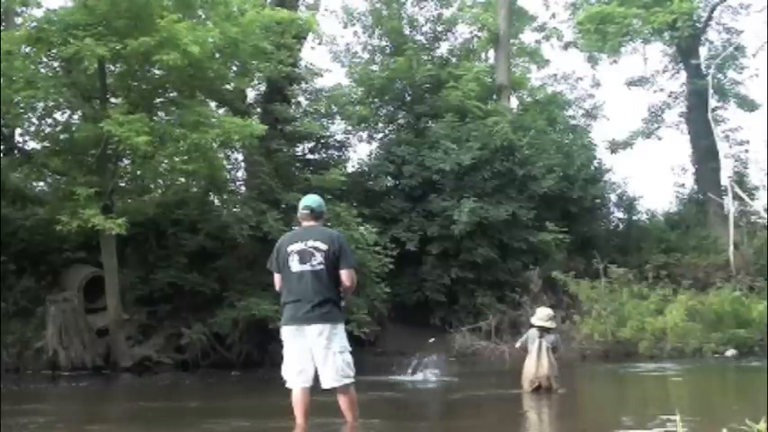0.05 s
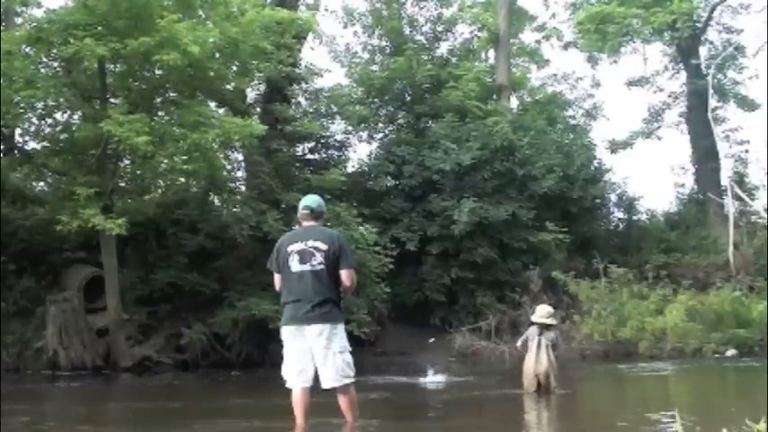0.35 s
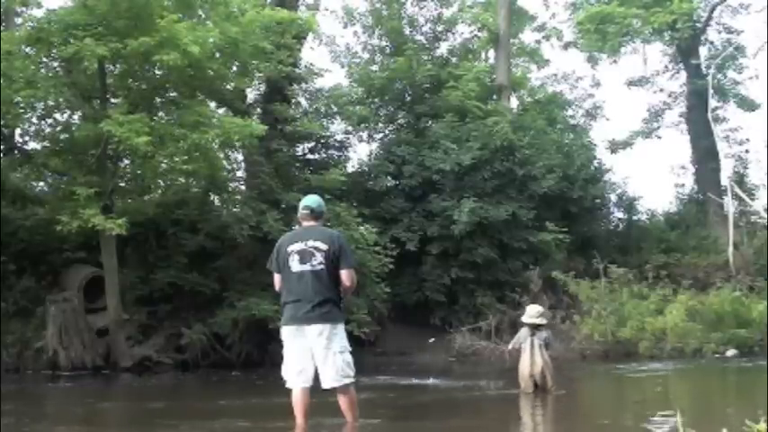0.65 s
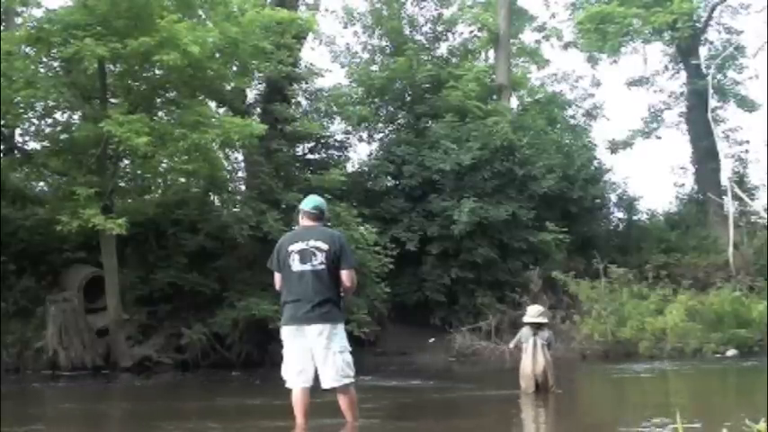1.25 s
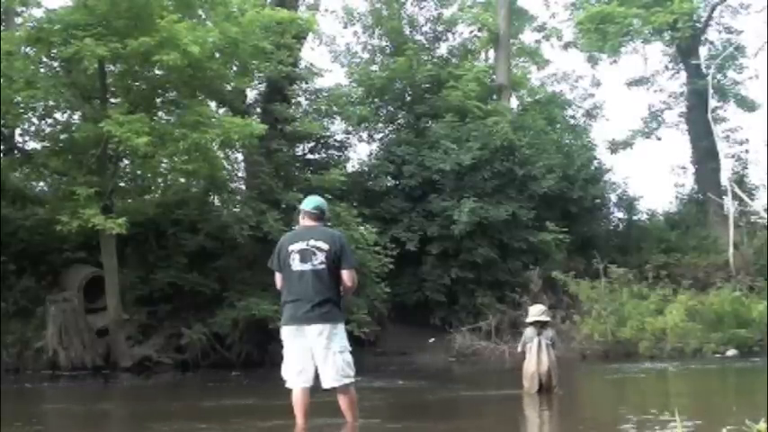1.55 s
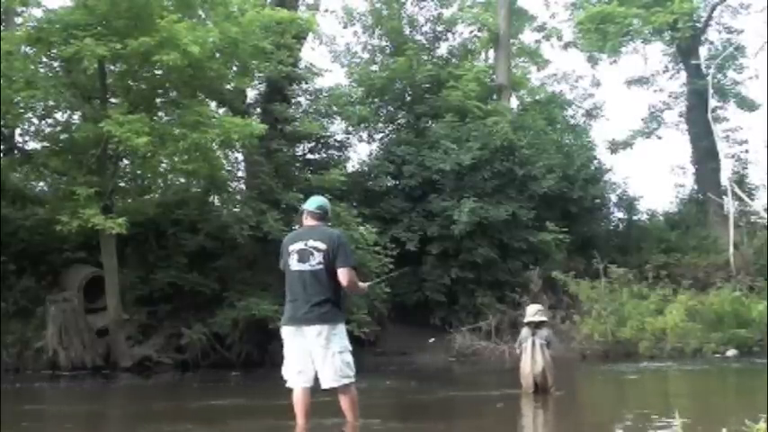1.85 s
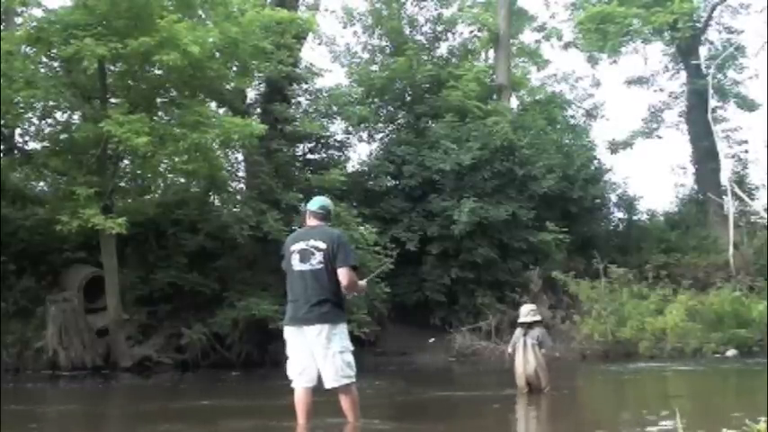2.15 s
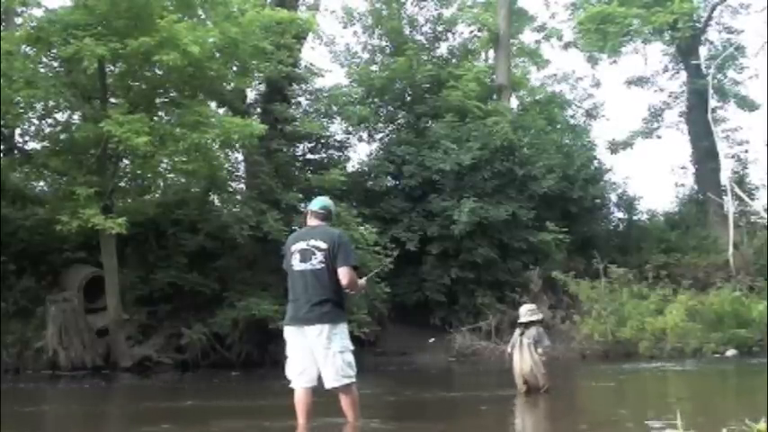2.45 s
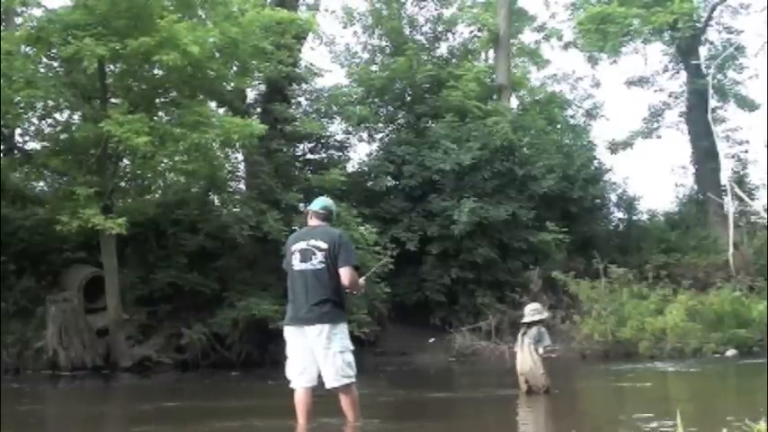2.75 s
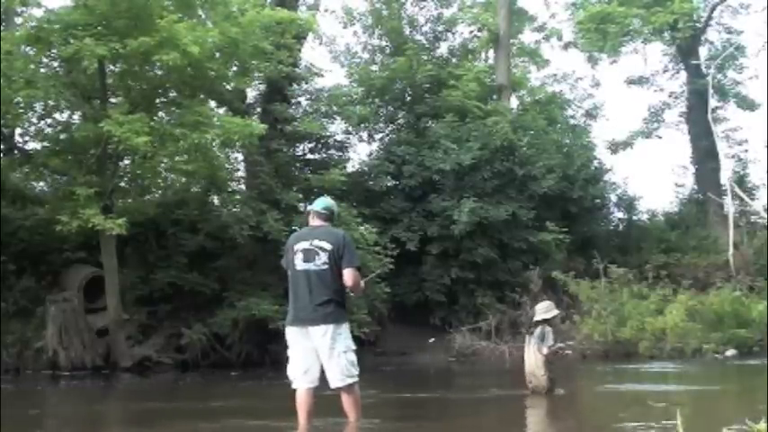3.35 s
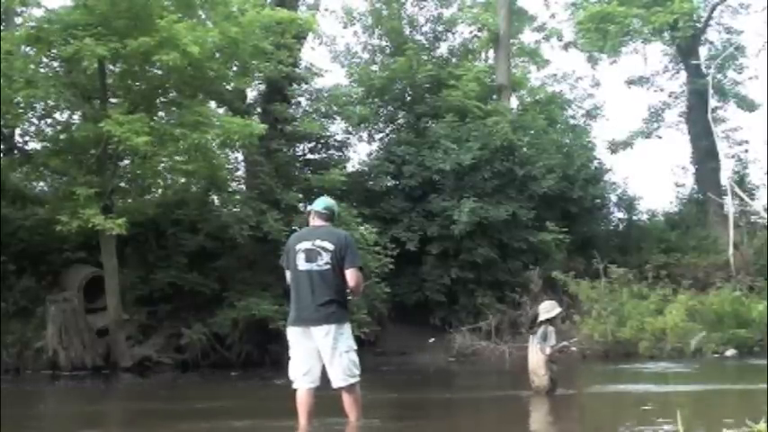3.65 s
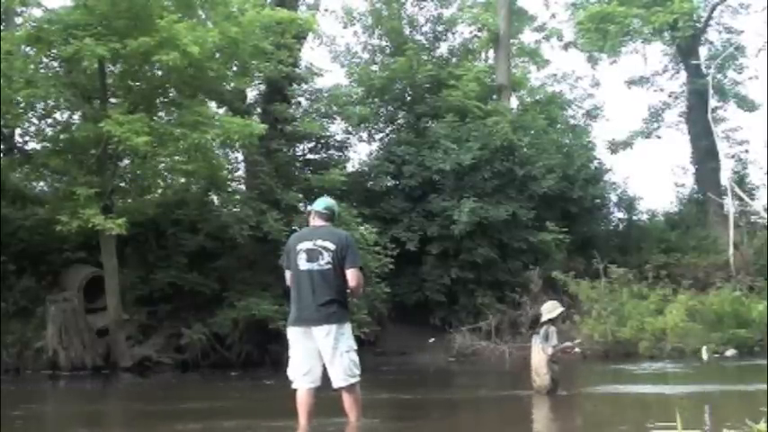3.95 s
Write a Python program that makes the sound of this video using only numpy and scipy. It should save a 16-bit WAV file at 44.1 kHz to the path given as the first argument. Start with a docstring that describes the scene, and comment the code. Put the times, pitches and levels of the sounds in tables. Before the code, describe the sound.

Water splashes in a shallow stream and settles into scattered drips before a smaller, sharp splash follows. Around it, birds chirp, buzz and trill from the bank, with faint insect hiss and a distant motor hum.

```python
"""A shallow creek. Something splashes: water sloshes, spray patters down and trapped air plops, mostly
dying away within a second. Stray drops tick; two sharp splats and more spray follow near 3 s.
Birds whistle, slur, buzz and trill in the trees on the bank, their gliding tones scattered by leaves,
over a low outdoor rumble, a thin insect hiss and a distant motor hum."""
import sys
import numpy as np
from scipy import signal
from scipy.fft import rfft, irfft
from scipy.io import wavfile

SR = 44100
rng = np.random.default_rng(int(sys.argv[2]) if len(sys.argv) > 2 else 0)


def pcm_store(signal):
    """Save signal as 16-bit PCM."""
    levels = np.round(np.clip(np.atleast_2d(signal), -1, 1) * 32767)
    wavfile.write(sys.argv[1], SR, levels.astype(np.int16).T)


N = 176400
T, HZ = np.arange(N) / SR, np.fft.rfftfreq(N, 1 / SR)

# Spray spectrum. Each row: frequency in Hz, relative level in dB.
SPRAY_SPECTRUM = [(1500, 2), (3000, 0.5), (4800, -5.5), (6500, 1), (8000, 4), (9500, -1), (11000, -5),
                  (13500, -9.5), (16000, -37)]


def amp(db):
    """Decibels to gain."""
    return 10 ** (np.asarray(db) / 20)


def unit(x):
    """Scale to rms 1."""
    return x / np.sqrt(np.mean(x ** 2) + 1e-20)


def at_hz(table, hz):
    """Interpolate on a log-frequency axis."""
    table_hz, value = np.transpose(table)
    return np.interp(np.log(hz + 1), np.log(table_hz), value)


def envelope(table, column=1):
    """Gain over time from one dB column."""
    table = np.array(table)
    return amp(np.interp(T, table[:, 0], table[:, column]))


def add(mix, start_s, sound):
    """Mix a sound in at start_s."""
    part = mix[max(round(start_s * SR), 0):][:len(sound)]
    part += sound[:len(part)]


def drift(rate_hz):
    """Random wander below rate_hz, rms 1."""
    return unit(irfft(rfft(rng.standard_normal(N)) / (1 + (HZ / rate_hz) ** 4), N))


def echoes(x, t60_s, spread):
    """Sparse reflections off leaves or banks; spread sets the stereo width."""
    t = T[:SR]
    taps = rng.standard_normal((2, SR)) * (rng.random((2, SR)) < .05)
    taps *= amp(-60 * t / t60_s) * (1 - np.exp(-t / .0029))
    taps /= np.linalg.norm(taps, axis=1, keepdims=True)
    mid, side = signal.fftconvolve(x[None], taps, axes=1)[:, :N]
    return np.array([mid + spread * side, mid - spread * side])


def bubble(hz, t60_s):
    """Trapped air rings: one-cycle attack, rising pitch, exponential decay."""
    t = np.arange(0, t60_s, 1 / SR)
    ring = np.sin(2 * np.pi * hz * t * (1 + .18 * t / t60_s))
    return ring * (1 - np.exp(-t * hz)) * amp(-60 * t / t60_s)


def bubble_swarm(low_hz, high_hz, per_s, spread_db, cycles=28, sizes=30):
    """Bubbles of many sizes ring at random times and strengths."""
    out = np.zeros(N)
    for hz in np.geomspace(low_hz, high_hz, sizes):
        hits = (rng.random(N) < per_s / sizes / SR) * amp(spread_db * rng.exponential(1, N).clip(max=3))
        out += signal.oaconvolve(hits, bubble(hz, cycles / hz))[:N] * np.sqrt(hz)
    return unit(out)


def spray_patter(per_s, spread_db, decay_s, kinds=16):
    """Spray lands as tiny bright noise ticks."""
    out = np.zeros(N)
    for _ in range(kinds):
        hits = rng.random(N) < per_s / kinds / SR
        strength = amp(spread_db * rng.exponential(1, N).clip(max=3.5))
        tick = rng.standard_normal(512) * np.exp(-T[:512] / decay_s)
        out += signal.oaconvolve(hits * strength, tick)[:N]
    return unit(irfft(rfft(out) * amp(at_hz(SPRAY_SPECTRUM, HZ)), N))


def splash(spray, spurts):
    """Large bubbles slosh; smaller ones churn in spurts with the spray."""
    # Each row: time in seconds, then slosh, churn and spray levels in dB.
    levels = [(0, -39.5, -51, -45.5), (.06, -51, -60, -41.5), (.18, -53.5, -56, -41),
              (.26, -55.5, -58, -44.5), (.41, -50.5, -54, -46.5), (.47, -61.5, -48.5, -44),
              (.62, -47, -51, -46), (.75, -55, -56, -49), (.81, -55.5, -62, -61), (1.2, -62.5, -83, -62.5),
              (1.7, -88, -88, -74)]
    slosh = envelope(levels, 1) * bubble_swarm(216, 820, per_s=800, spread_db=2, cycles=26.5)
    churn = envelope(levels, 2) * bubble_swarm(1285, 4180, per_s=1600, spread_db=6.5)
    return slosh + spurts * (churn + envelope(levels, 3) * spray)


def drizzle(spray):
    """Fine spray and small bubbles fizz on the surface."""
    # Each row: time in seconds, level in dB.
    levels = [(1.2, -67), (2.3, -68), (3.04, -59.5), (3.14, -51.5), (3.22, -54.5), (3.36, -54), (3.47, -62),
              (4, -61.5)]
    fizz = amp(-2.5) * bubble_swarm(6700, 9100, per_s=330, spread_db=5)
    drips = amp(-3.5) * bubble_swarm(1144, 3060, per_s=250, spread_db=5)
    return envelope(levels) * (spray + fizz + drips)


def stereo_noise(gain):
    """Coloured noise, widest in the midrange."""
    # Each row: frequency in Hz, left-right correlation from 0 to 1.
    correlation = [(60, 1), (250, 0.97), (600, 0.61), (2000, 0.24), (5000, 0.85), (9000, 1)]
    left, independent = rfft(rng.standard_normal((2, N)))
    shared = np.clip(at_hz(correlation, HZ), 0, 1)
    right = shared * left + np.sqrt(1 - shared ** 2) * independent
    return unit(irfft(np.array([left, right]) * gain, N))


def open_air():
    """Outdoor rumble and hiss, wavering slightly."""
    # Each row: frequency in Hz, relative spectral density in dB.
    spectrum = [(15, -53), (25, -25), (102, 1), (157, 0.5), (299, -5), (425, -8), (527, -9), (769, -13.5),
                (1780, -20.5), (2660, -17), (4330, -23), (5370, -15.5), (6140, -23), (8050, -26.5),
                (15800, -28)]
    return stereo_noise(amp(at_hz(spectrum, HZ))) * amp(.5 * drift(2.7))


def insects(centre_hz=5417, half_width_hz=280):
    """Insects merge into a narrow band of hiss."""
    return stereo_noise(1 / (1 + ((HZ - centre_hz) / half_width_hz) ** 4))


def motor():
    """A distant motor hums on three wandering tones."""
    # Each row: time in seconds, level in dB.
    levels = [(0, -56), (2.0, -60.5), (2.88, -62), (2.98, -52.5), (3.7, -50.5), (3.95, -62)]
    # Each row: frequency in Hz, relative level in dB.
    tones = [(162, 0), (210, -8), (264, -11)]
    hum = np.zeros(N)
    for hz, db in tones:
        gain = amp(db + 1.2 * drift(5.9))
        hum += gain * np.sin(2 * np.pi * np.cumsum(hz + 1.26 * drift(5.16)) / SR)
    return np.sqrt(2) * envelope(levels) * hum


def plops():
    """Single pockets of trapped air ring out."""
    # Each row: start in seconds, pitch in Hz, level in dB, T60 in seconds.
    pockets = [(.003, 214, -38.5, 0.2), (.012, 562, -40.5, 0.14), (.067, 1450, -20.5, 0.023),
               (.0745, 1555, -17, 0.011), (.119, 1090, -26, 0.01), (.265, 780, -34.5, 0.039),
               (.4455, 1546, -23.5, 0.022), (.4515, 2030, -25, 0.0097), (.551, 571, -26.5, 0.068),
               (.561, 467, -29.5, 0.058), (.573, 690, -26.5, 0.022), (.599, 778, -30.5, 0.038),
               (.632, 351, -33.5, 0.05), (.683, 1780, -33, 0.025), (.804, 756, -27, 0.017),
               (.804, 1330, -26.5, 0.0095), (1.465, 1005, -40.5, 0.056), (2.978, 1490, -40, 0.035),
               (3.0368, 1550, -18.5, 0.0072), (3.044, 2010, -27.5, 0.02), (3.1657, 1810, -14.5, 0.0046),
               (3.463, 1143, -40.5, 0.058)]
    out = np.zeros(N)
    for start_s, hz, db, t60_s in pockets:
        add(out, start_s, amp(db) * bubble(hz, t60_s))
    return out


def splats(half_width_hz=830, skirt_db=-13.5, tail_db=-15.5, tail_s=.0092):
    """Water slaps water: short bright cracks with fizzing tails."""
    # Each row: centre time in seconds, level in dB, centre in Hz, half-length in seconds.
    slaps = [(0.061, -30, 6130, 0.0018), (0.0777, -28.5, 8250, 0.0053), (.093, -18, 5900, 0.0007),
             (0.1146, -19.5, 8400, 0.00053), (0.1636, -24, 7760, 0.0025), (0.1745, -20, 7640, 0.0029),
             (0.227, -29, 8700, 0.0017), (0.437, -29, 8900, 0.0014), (0.4465, -15, 8770, 0.0012),
             (0.453, -23, 7260, 0.0012), (0.685, -35, 7500, .005), (3.0386, -15, 8800, 0.0011),
             (3.15, -12, 8000, 0.00033)]
    t, f = T[:2048] - T[512], np.fft.rfftfreq(2048, 1 / SR)
    skirt = amp(skirt_db + .48 * at_hz(SPRAY_SPECTRUM, f)) * (f > 900)
    out = np.zeros(N)
    for centre_s, db, hz, half_s in slaps:
        band = 1 / (1 + ((f - hz) / half_width_hz) ** 2) + skirt
        fizz = unit(irfft(rfft(rng.standard_normal(len(t))) * band))
        shape = np.exp(-(t / half_s) ** 2)
        crack = fizz * shape
        crack *= np.linalg.norm(shape) / np.linalg.norm(crack)
        tail = fizz * (t > 0) * np.exp(-abs(t) / tail_s) * amp(tail_db)
        add(out, centre_s + t[0], .5 * amp(db) * (crack + tail))
    return out


def bird_note(length_s, pitches_hz, db, waver=.0098, rise_s=.0056, release=.28, flutter=0, flutter_hz=0):
    """A whistle gliding through three pitches; release is a share of its length."""
    t = np.arange(0, length_s, 1 / SR)
    progress = t / length_s
    wobble_band = signal.butter(2, [90, 380], "bandpass", fs=SR, output="sos")
    wobble = unit(signal.sosfilt(wobble_band, rng.standard_normal(SR)))[:len(t)]
    shake = flutter * np.cos(2 * np.pi * flutter_hz * t)  # moves pitch and level together
    glide_hz = np.polyval(np.polyfit([0, .5, 1], pitches_hz, 2), progress)
    hz = glide_hz * (1 + waver * wobble) + flutter_hz * shake
    ramp = np.clip(np.minimum(t / rise_s, (1 - progress) / release), 0, 1)
    shape = np.sin(np.pi / 2 * ramp) ** 2 * (1 + shake / 2)
    return amp(db) * np.sqrt(2) * shape * np.sin(2 * np.pi * np.cumsum(hz) / SR)


def held_whistles(sag_hz_per_s=533):
    """A bird holds a thin, fluttering whistle that sags in pitch."""
    # Each row: start in seconds, length in seconds, start pitch in Hz, level in dB.
    notes = [(0.17, .21, 5010, -49), (3.743, 0.7, 4900, -50.5)]
    out = np.zeros(N)
    for start_s, length_s, hz, db in notes:
        sag_hz = np.linspace(hz, hz - sag_hz_per_s * length_s, 3)
        add(out, start_s, bird_note(length_s, sag_hz, db, release=.57, flutter=.72, flutter_hz=30.75))
    return out


def stray_drops():
    """Single drops tick on the surface, each ringing a tiny bubble."""
    # Each row: start in seconds, level in dB.
    drops = [(.301, -19), (.716, -24), (1.826, -34), (2.147, -32), (2.327, -32.5), (2.672, -28),
             (2.879, -27), (3.191, -19.5), (3.286, -23), (3.303, -17.5), (3.323, -25), (3.355, -23)]
    out = np.zeros(N)
    for start_s, db in drops:
        add(out, start_s, amp(db) * bubble(hz=rng.uniform(6450, 8400), t60_s=.0026))
    return out


def rising_calls():
    """One bird repeats a rising note."""
    # Each row: start in seconds, level in dB.
    notes = [(.45, -44), (.592, -43), (.724, -44.5), (.857, -44.5), (.995, -48), (1.138, -49.5)]
    out = np.zeros(N)
    for start_s, db in notes:
        add(out, start_s, bird_note(.0504, (3180, 3644, 3520), db, rise_s=.022))
    return out


def slurs():
    """Slurred bird whistles; wider glides waver more."""
    # Each row: start and length in seconds, start, middle and end pitch in Hz, level in dB.
    notes = [(0.926, .05, 7850, 7700, 6660, -56.5), (1.032, 0.045, 3024, 2890, 2760, -57),
             (1.091, 0.068, 3450, 3240, 3150, -54), (1.618, 0.024, 4090, 3770, 2930, -48),
             (1.735, 0.034, 3080, 2830, 2520, -53.5), (2.082, 0.068, 3750, 2970, 2490, -48.5),
             (2.151, 0.17, 2587, 2533, 2470, -55.5), (2.367, 0.21, 2500, 2600, 2497, -57),
             (2.663, 0.076, 2262, 2703, 3180, -47), (2.85, 0.25, 2504, 2500, 2520, -57.5),
             (3.09, 0.133, 2910, 3010, 2730, -53), (3.166, 0.035, 2950, 3440, 4200, -41),
             (3.19, 0.072, 2700, 2403, 2350, -45.5), (3.258, 0.089, 2469, 2541, 2534, -43.5),
             (3.342, 0.042, 3346, 2900, 2100, -46.5)]
    out = np.zeros(N)
    for start_s, length_s, start_hz, middle_hz, end_hz, db in notes:
        waver = .003 + .045 * abs(end_hz - start_hz) / middle_hz
        add(out, start_s, bird_note(length_s, (start_hz, middle_hz, end_hz), db, waver))
    return out


def buzzy_calls():
    """Fast flutter makes a bird's note buzz; a thin high whistle tops it."""
    # Each row: start in seconds, buzz level in dB, whistle level in dB.
    calls = [(3.001, -54, -50), (3.313, -47.5, -47.5), (3.617, -46.5, -47)]
    buzzes, tops = np.zeros((2, N))
    for start_s, buzz_db, top_db in calls:
        add(buzzes, start_s, bird_note(.19, (4072, 4072, 4072), buzz_db, waver=.025, rise_s=.028,
                                       release=.57, flutter=.36, flutter_hz=310))
        add(tops, start_s + .068, bird_note(.05, (7600, 7770, 7790), top_db))
    return buzzes, tops


def trill():
    """A bird's quick run of falling notes."""
    # Each row: start in seconds, level in dB.
    notes = [(3.75, -53), (3.797, -46), (3.845, -47.5), (3.894, -48.5), (3.941, -46.5), (3.988, -43)]
    out = np.zeros(N)
    for start_s, db in notes:
        add(out, start_s, bird_note(.018, (3700, 3280, 2980), db))
    return out


def creek(low_cut_hz=110, bank_cutoff_hz=4200):
    """All the water, with dull reflections off the banks."""
    spurts = amp(1.6 * drift(35))
    spray = spray_patter(per_s=1700, spread_db=4.2, decay_s=.001)
    water = splash(spray, spurts) + drizzle(spray) + splats() + stray_drops() + plops()
    water = signal.sosfilt(signal.butter(2, low_cut_hz, "highpass", fs=SR, output="sos"), water)
    dulled = irfft(rfft(water) / (1 + (HZ / bank_cutoff_hz) ** 2), N)
    return water + amp(-10.5) * echoes(dulled, t60_s=.22, spread=.52)


def birds(trees_t60_s=.72):
    """Near birds are fairly dry; those deeper in the trees are washed in echoes."""
    near = rising_calls() + held_whistles() + trill()
    buzzes, tops = buzzy_calls()
    far = tops + slurs()
    near = (near + buzzes) * amp(1.8 * drift(70))  # the level flickers
    near = near + amp(-7.5) * echoes(near, trees_t60_s, spread=.9)
    return near + amp(-2.8) * far + amp(-2) * echoes(far, trees_t60_s, spread=.27)


def scene():
    """Creek and birds over insects; air and motor sit slightly left."""
    foreground = creek() + birds()
    air = amp(-49) * open_air()
    hiss = amp(-60) * insects()
    pan = amp([[.85], [-.85]])
    return foreground + hiss + pan * (air + motor())


def record(dry):
    """Low-pass at 16 kHz."""
    lowpass = signal.firwin(511, 16000, window=("kaiser", 9), fs=SR)
    return signal.oaconvolve(dry, lowpass[None], "same")


dry = scene()
out = record(dry)
pcm_store(out)
```